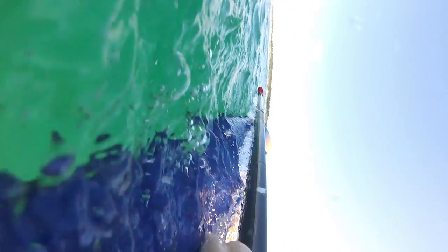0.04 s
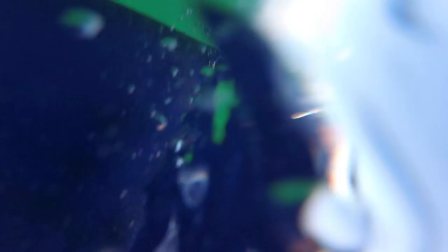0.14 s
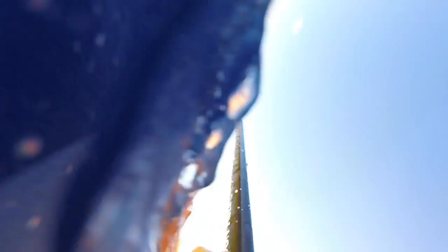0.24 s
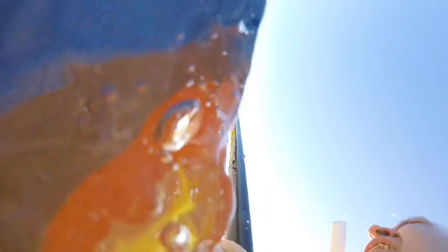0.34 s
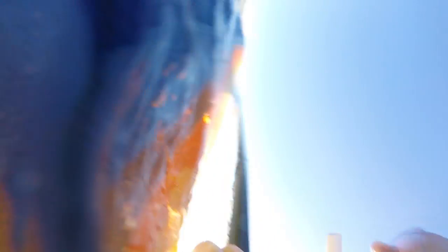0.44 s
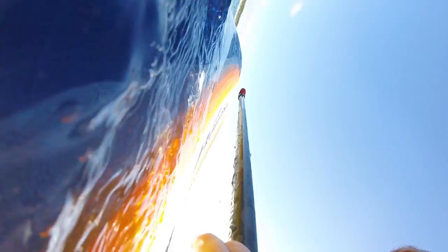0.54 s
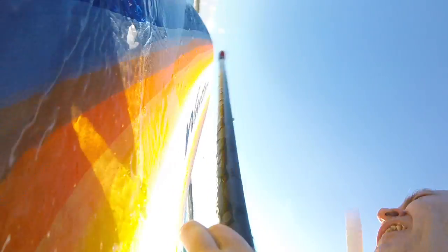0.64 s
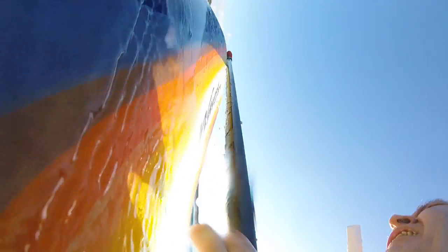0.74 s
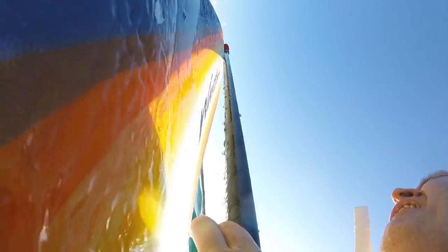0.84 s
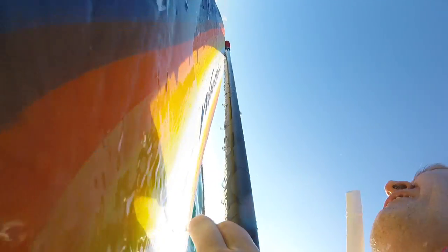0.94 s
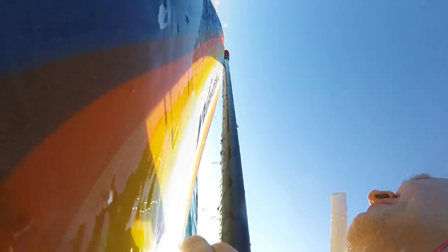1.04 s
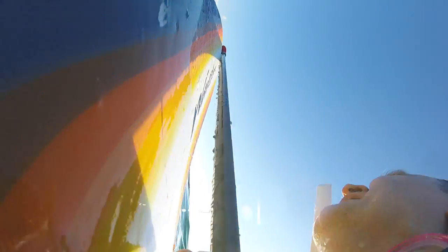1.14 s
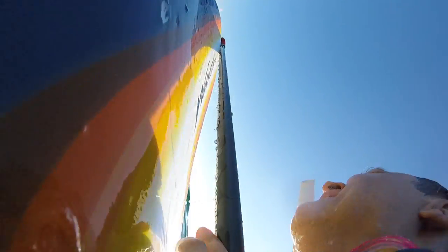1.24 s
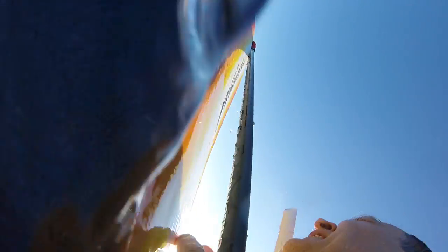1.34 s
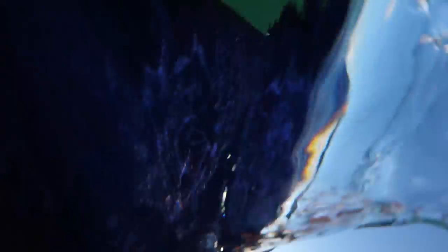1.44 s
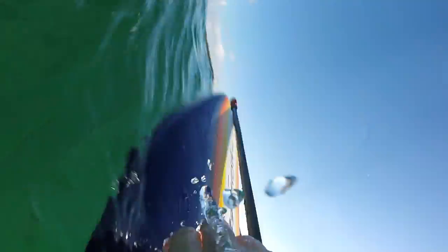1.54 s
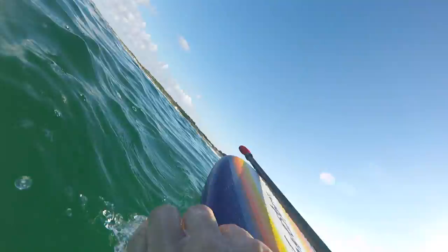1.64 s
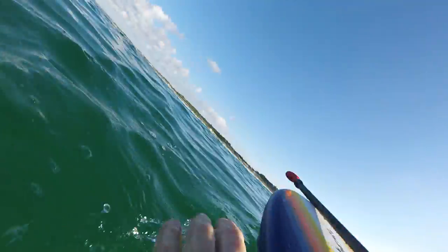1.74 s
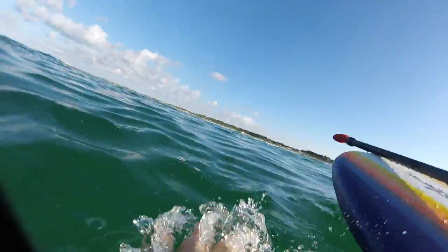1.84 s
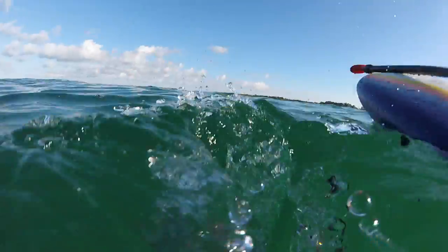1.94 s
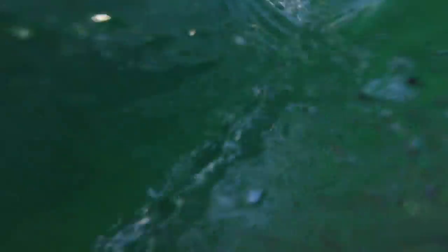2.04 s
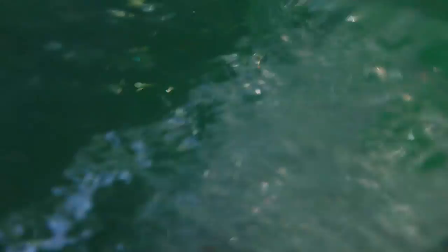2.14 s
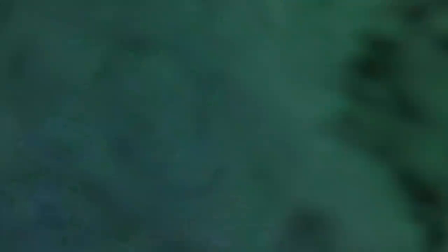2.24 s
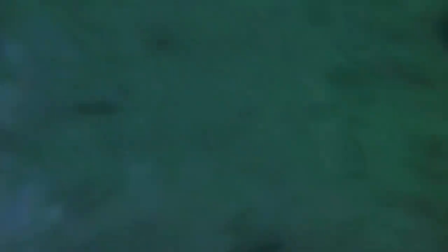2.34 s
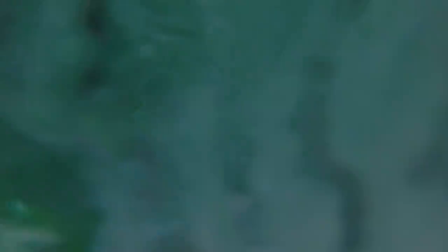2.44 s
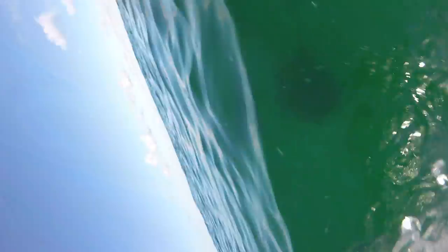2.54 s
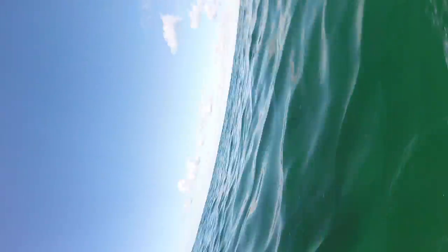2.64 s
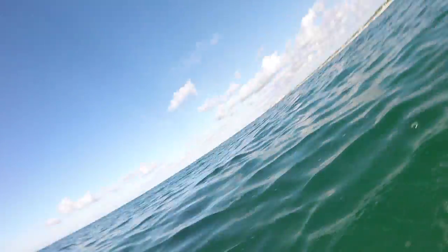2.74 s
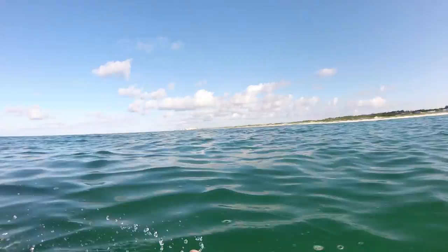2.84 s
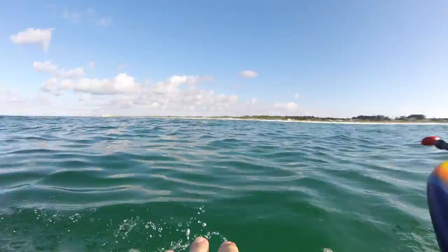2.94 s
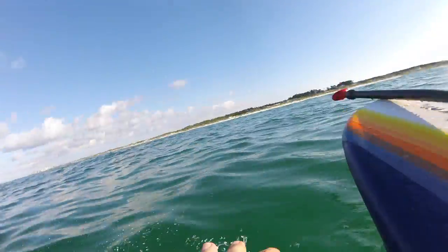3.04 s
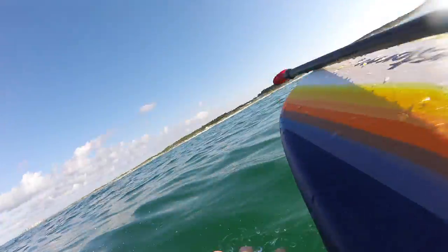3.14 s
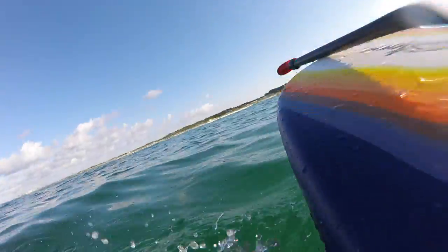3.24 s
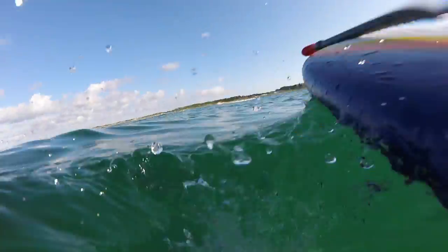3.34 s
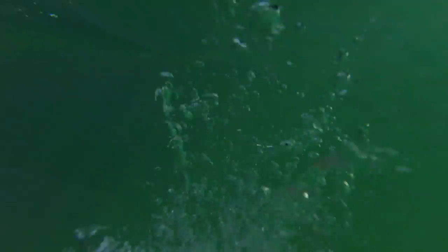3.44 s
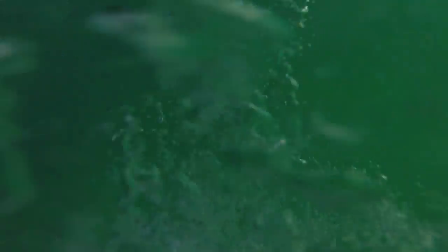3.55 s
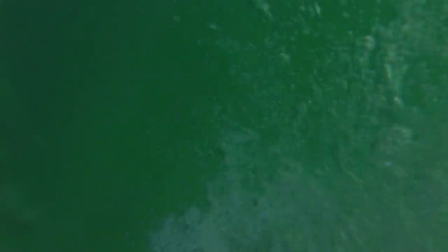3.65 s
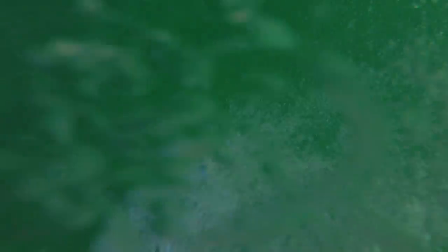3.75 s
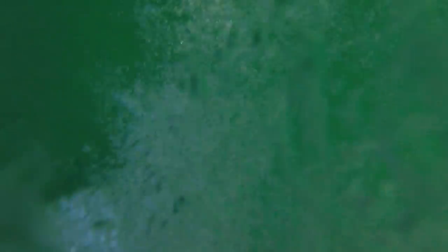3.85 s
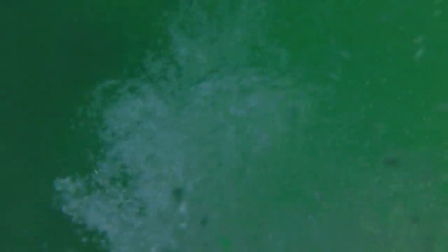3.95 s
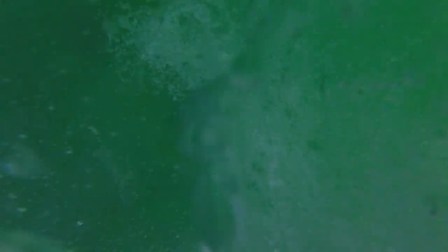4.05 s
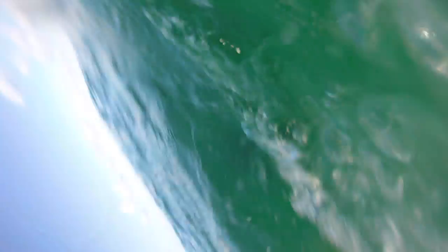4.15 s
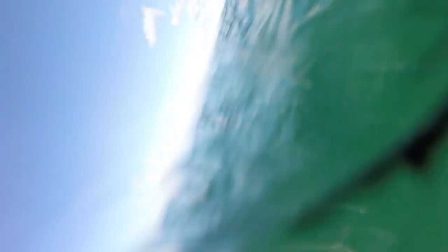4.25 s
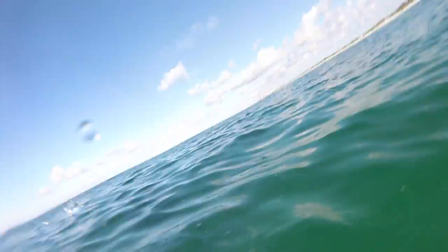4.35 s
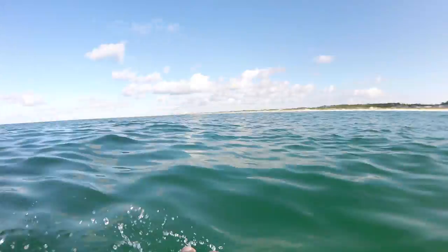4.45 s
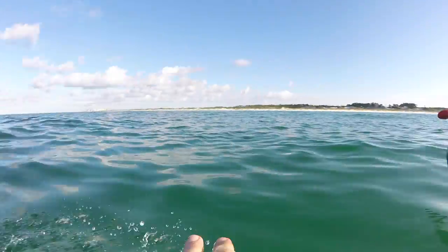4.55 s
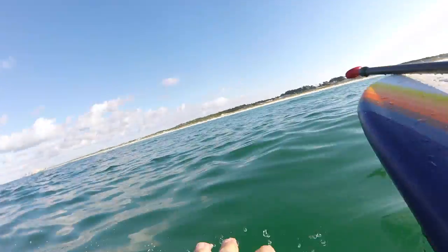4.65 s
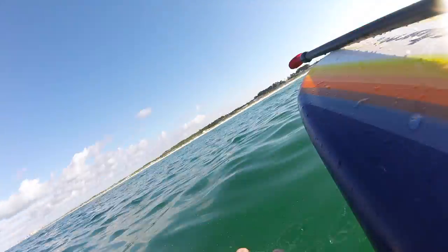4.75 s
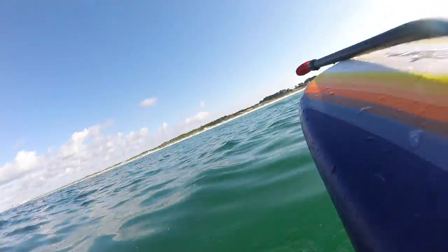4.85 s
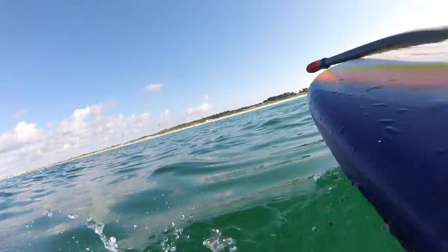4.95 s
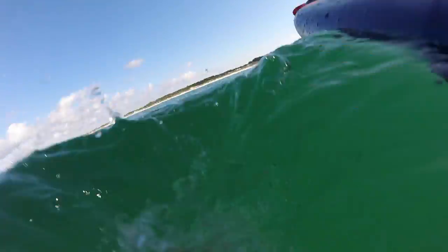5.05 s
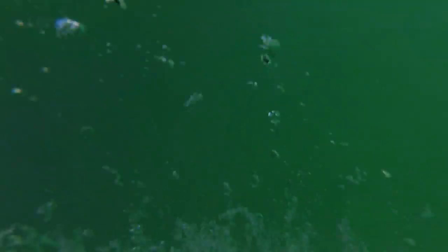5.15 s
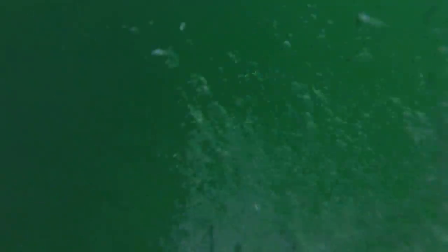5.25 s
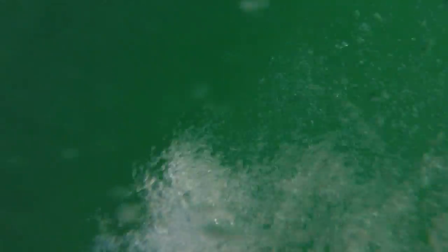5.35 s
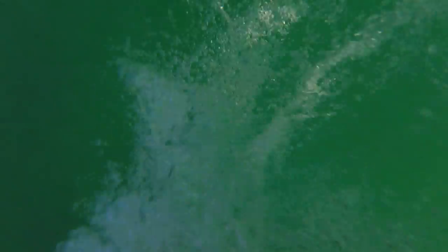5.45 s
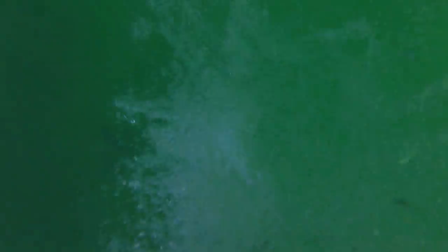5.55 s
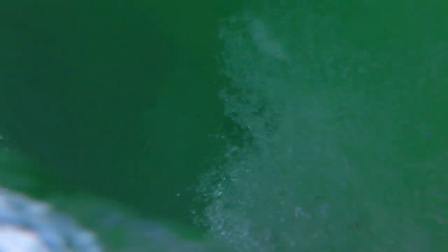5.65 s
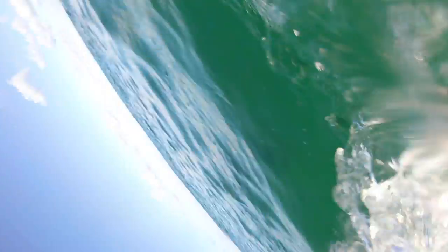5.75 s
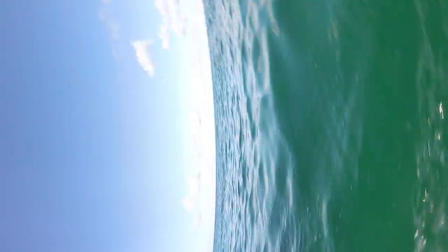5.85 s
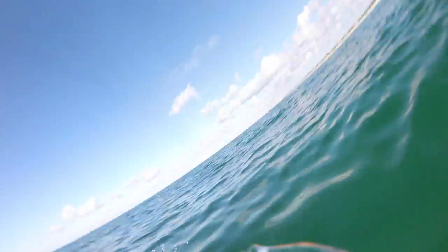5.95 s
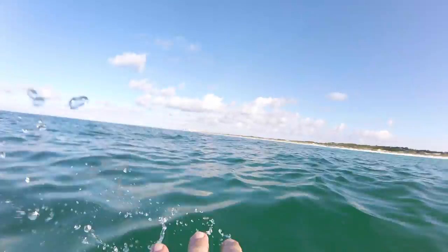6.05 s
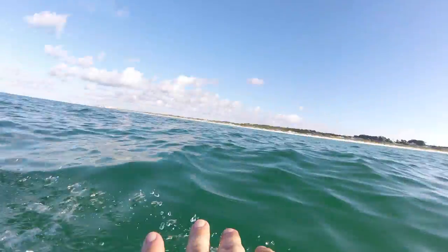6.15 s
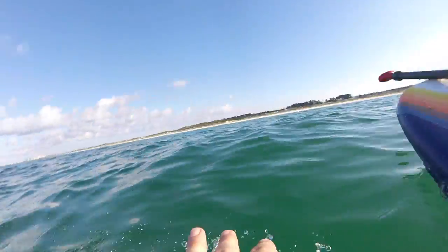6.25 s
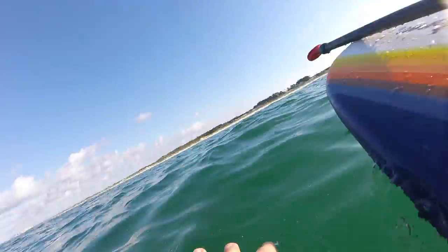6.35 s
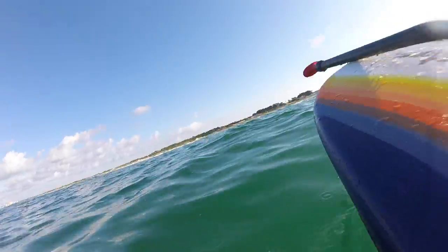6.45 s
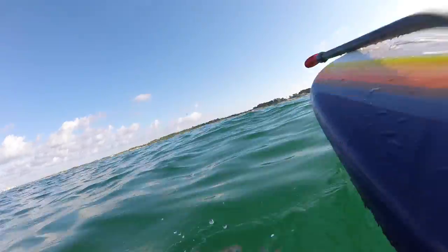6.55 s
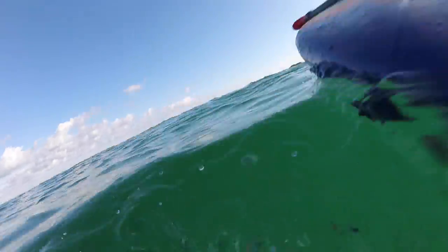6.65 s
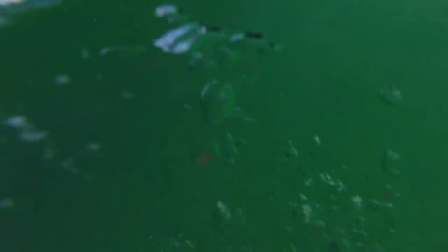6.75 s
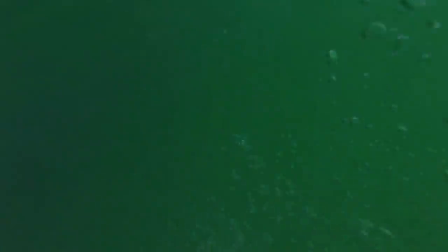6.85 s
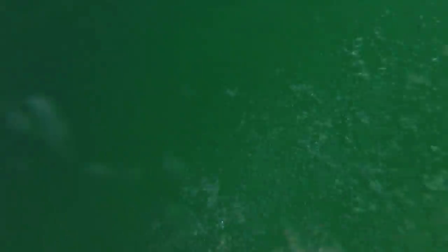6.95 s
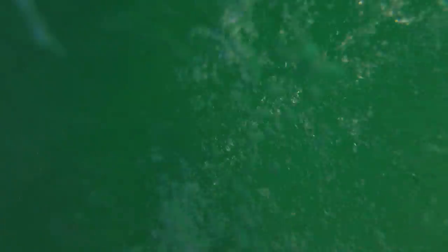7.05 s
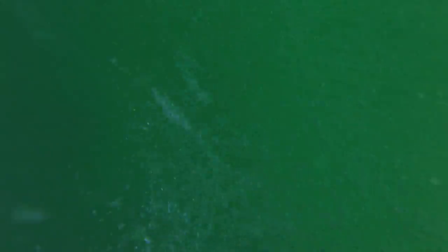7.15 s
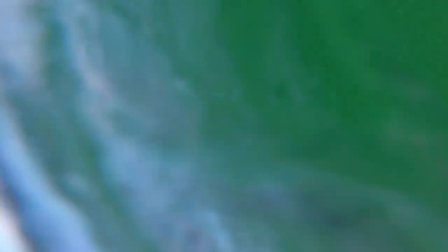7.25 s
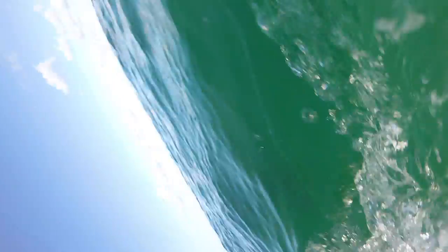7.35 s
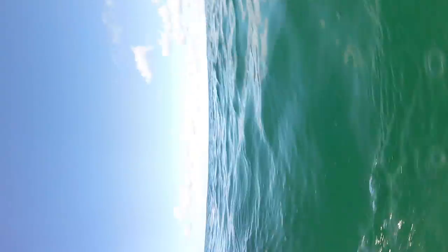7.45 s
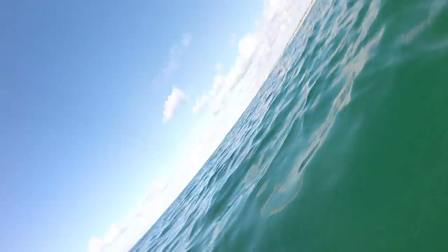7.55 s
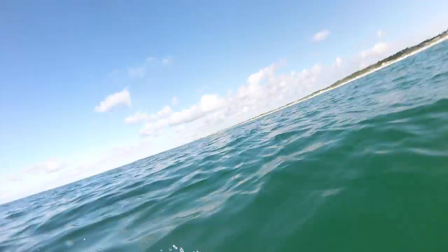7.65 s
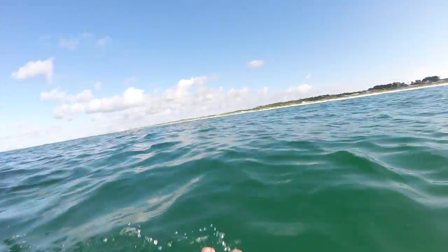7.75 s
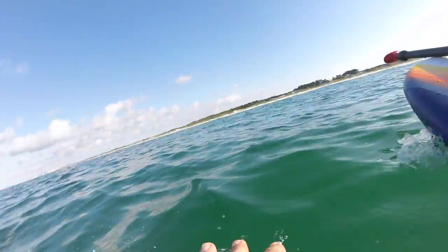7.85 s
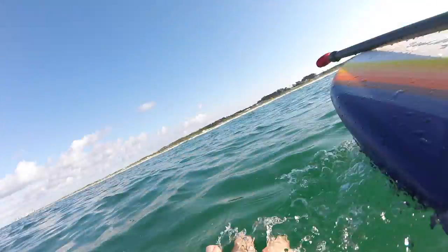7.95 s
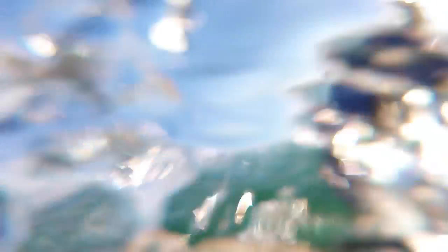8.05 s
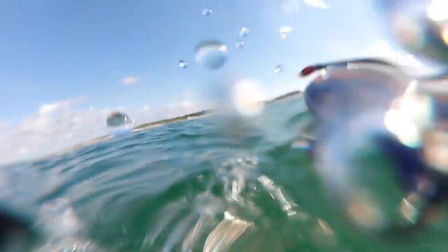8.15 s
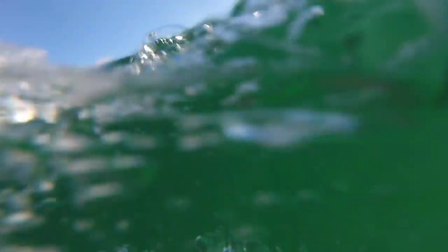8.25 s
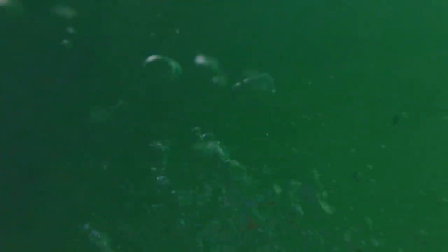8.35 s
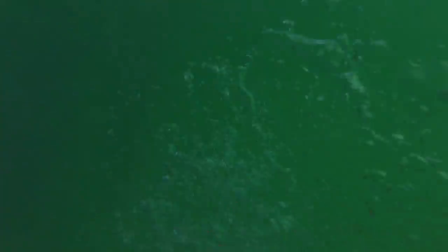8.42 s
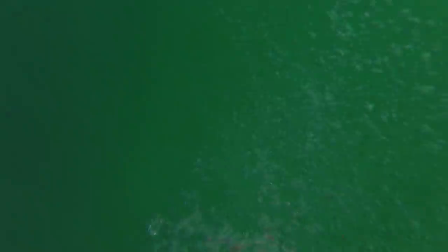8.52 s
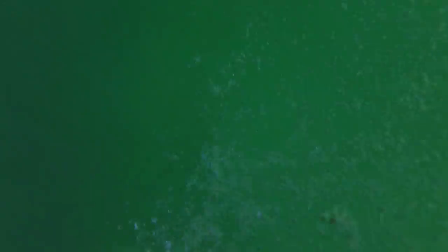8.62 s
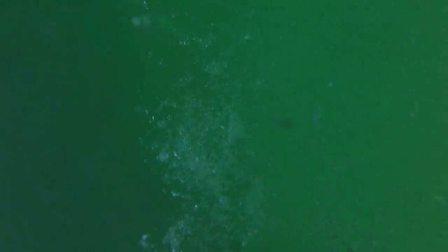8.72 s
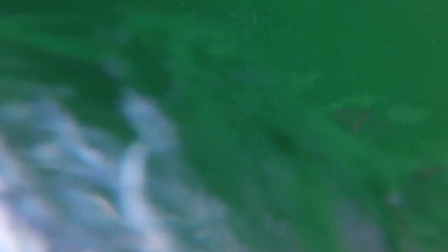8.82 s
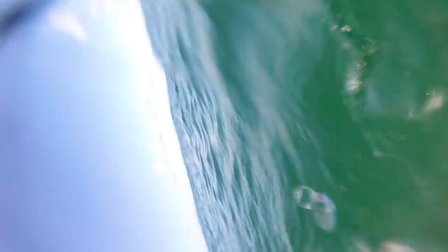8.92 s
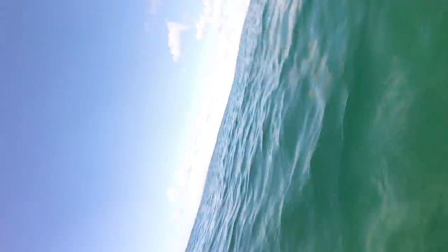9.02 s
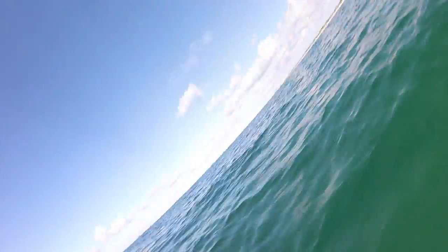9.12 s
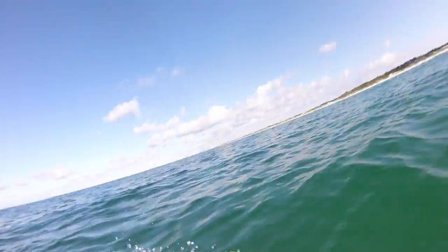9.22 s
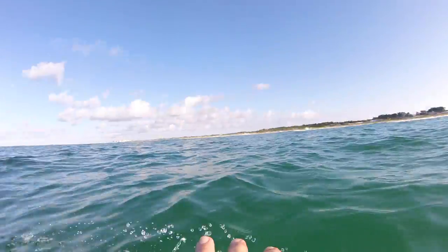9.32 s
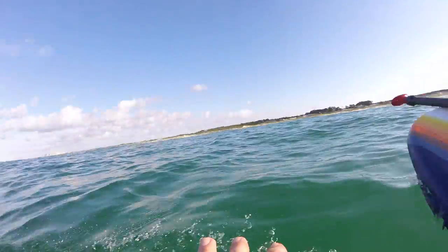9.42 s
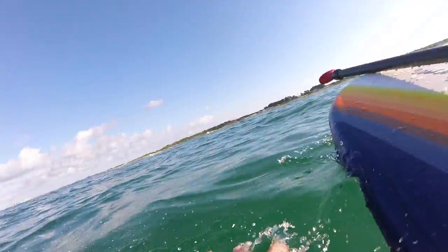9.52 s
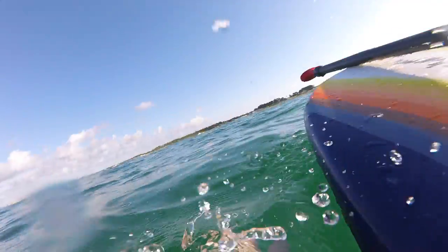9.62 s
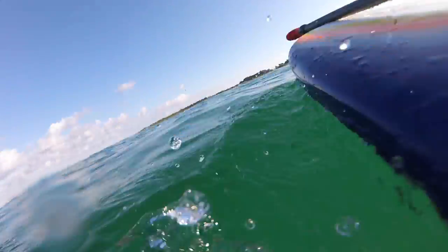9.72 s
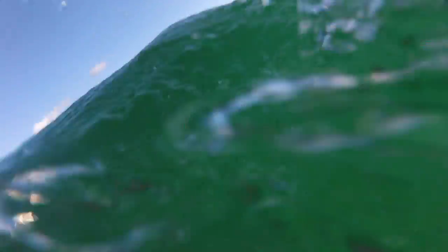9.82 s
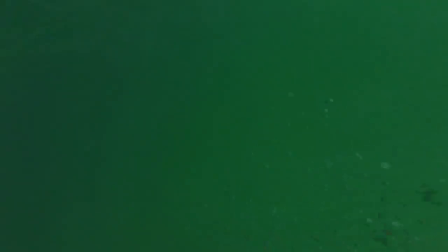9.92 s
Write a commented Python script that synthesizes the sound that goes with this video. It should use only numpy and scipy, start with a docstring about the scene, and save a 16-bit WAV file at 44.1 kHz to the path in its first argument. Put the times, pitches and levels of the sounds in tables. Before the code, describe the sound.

Close, muffled water sounds from a sealed microphone on a paddler's hand, beside a board in small waves. From 0 to 1.5 seconds, deep soft slaps land irregularly, at about 0.25, 0.5, 0.8, 1.1 and 1.4, with brief splashes, tiny crackles and slow low pressure rumble. Around 1.5 a wet plop and drips, then run-off swishes glide downward. At 2.1 the first plunge gurgles with thumps and hollow bubbles, fading by 2.7. A soft airy swing and light spray follow. Stronger plunges come at about 3.5, 5.15, 6.8 and 8.35, each opening with a bubbly burst, then half a second of low gurgling, fizz and rising bloops. Between them, near 4.5, 6.1, 7.7 and 9.3, low windy rushes swell over quiet wash, and splashing builds toward each entry. A sharper splash and slap lead into 8.35. The last plunge begins at 9.9 and is cut off.

```python
"""Hand-paddled board in small waves

Heard inside a sealed housing on the paddler's stroking arm: first, slaps as pressure pulses and dribbles
as ringing air pockets. Then six strokes plunge it into clouds of damped, rising bubble tones. Between
plunges band-limited noise makes wind and flow, and random clicks and bubbles make the spray.
The housing muffles: most layers fade steeply above about 3 kHz, leaving faint crackle, hiss and drops."""
import sys
import numpy as np
from scipy import signal
from scipy.fft import rfft, irfft, next_fast_len
from scipy.io import wavfile
from scipy.ndimage import uniform_filter1d

SR = 44100
rng = np.random.default_rng(int(sys.argv[2]) if len(sys.argv) > 2 else 0)


def materialize(psi):
    """Save the field psi as 16-bit PCM at rate SR to the path in sys.argv[1].

    A 1-D psi becomes a single channel; in a 2-D psi each row is a channel.
    """
    bounded = np.clip(np.atleast_2d(psi).T, -1, 1)
    quanta = np.round(bounded * 32767).astype(np.int16)
    wavfile.write(sys.argv[1], SR, quanta)


N = 440110
TIME = np.arange(N) / SR


def from_db(db):
    """Logarithmic level: decibels to amplitude gain."""
    return 10 ** (np.asarray(db) / 20)


def rms_one(x):
    """Normalisation: scale to rms 1."""
    return x / np.sqrt(np.mean(x ** 2) + 1e-20)


def add(out, s, sound):
    """Superposition: mix a short sound into out, starting at s seconds."""
    start = max(round(s * SR), 0)
    part = sound[:max(N - start, 0)]
    out[start:start + len(part)] += part


def low_pass(x, hz, order):
    """Butterworth low-pass: flat below hz, steeper above with rising order."""
    return signal.sosfilt(signal.butter(order, min(hz, 0.45 * SR), fs=SR, output="sos"), x)


def coloured(x, colour):
    """Spectral shaping: weight x by a curve of (frequency [Hz], level [dB per Hz]), then set rms 1."""
    hz, db = np.transpose(colour)
    size = next_fast_len(N)
    bins = np.maximum(np.arange(size // 2 + 1) * SR / size, 1)
    shape = np.interp(np.log(bins), np.log(hz), db)
    # beyond its ends the curve falls by 12 dB per octave
    slope = np.minimum(bins / hz[0], 1) * np.minimum(hz[-1] / bins, 1)
    return rms_one(irfft(rfft(x, size) * from_db(shape) * slope ** 2, size)[:N])


def steadied(x, span_s):
    """Short-term power normalisation: hold rms near 1 over span_s, keeping all faster grain."""
    size = max(int(span_s * SR), 2)
    power = uniform_filter1d(uniform_filter1d(x ** 2, size), size)
    return x / np.sqrt(np.maximum(power, 1e-9))


def drift(per_s):
    """Slow random modulation: normal values of spread 1, joined by straight lines, per_s knots a second."""
    knots = rng.standard_normal(int(per_s * N / SR) + 2)
    return np.interp(TIME * per_s, np.arange(len(knots)), knots)


def envelope(s, hold_s, db, attack_s, release_s, sag_db_per_s=0):
    """Exponential envelope: climbs 60 dB to reach db at s, holds while sagging, then falls 60 dB."""
    t = np.arange(-int(attack_s * SR), int((max(hold_s, 0) + release_s) * SR)) / SR
    away = np.maximum(-t, 0) / attack_s + np.maximum(t - hold_s, 0) / release_s
    gain = from_db(db - 60 * away - sag_db_per_s * np.maximum(t, 0))
    out = np.zeros(N)
    add(out, max(s + t[0], 0), gain[s + t >= 0])
    return out


def ring(clicks, hz, t60):
    """Damped resonator: a unit click sets a decaying sine of height about 1 ringing."""
    r, w = from_db(-60 / (t60 * SR)), 2 * np.pi * hz / SR
    return signal.lfilter([0, np.sin(w)], [1, -2 * r * np.cos(w), r * r], clicks + 1e-18)


def random_clicks(per_s, spread_db):
    """Shot noise: clicks at random moments, many small and a few large."""
    sizes = from_db(spread_db * np.minimum(rng.exponential(1, N), 4)) * rng.choice([-1, 1], N)
    return sizes * (rng.random(N) < per_s / SR)


def bubble(hz, t60, rise, swell_cycles=0.05):
    """Bubble resonance: a decaying sine whose pitch climbs by the share rise, as on nearing the surface."""
    t = np.arange(int(t60 * SR) + 2) / SR
    shape = from_db(-60 * t / t60) * (1 - np.exp(-hz * t / swell_cycles))
    return shape * np.sin(2 * np.pi * hz * t * (1 + rise * t / t60 / 2))


def bubble_cloud(per_s, low_hz, high_hz, cycles, spread_db, clump_db, count=20):
    """Sum of random bubble resonances; those of one size come in clumps; rms 1."""
    clicks, dealt = random_clicks(per_s, spread_db), rng.integers(0, count, N)
    out = np.zeros(N)
    for k, hz in enumerate(np.geomspace(low_hz, high_hz, count)):
        clumps = from_db(clump_db * drift(per_s=20))
        tone = bubble(hz, cycles / hz, rise=0.25)
        out += hz * signal.oaconvolve(clicks * (dealt == k) * clumps, tone)[:N]
    return rms_one(out)


def stray_bubbles(per_s, low_hz, high_hz, cycles, rise, spread_db, wall_hz=2900):
    """Isolated bubble resonances of random time, size and pitch, low-passed by the housing wall."""
    out = np.zeros(N)
    for when, pitch, size in rng.random((int(per_s * N / SR), 3)):
        hz = low_hz * (high_hz / low_hz) ** pitch
        add(out, when * N / SR, from_db(-spread_db * size) * bubble(hz, cycles / hz, rise))
    return low_pass(out, wall_hz, order=5)


def gliding_noise(hz, width_hz):
    """Frequency shifting: low-passed complex noise moved up to the changing pitch hz."""
    noise = low_pass([1, 1j] @ rng.standard_normal((2, N)), width_hz, order=3)[:len(hz)]
    return np.real(noise * np.exp(2j * np.pi * np.cumsum(hz) / SR))


def wandering(centre_hz, wander_octaves, width_hz, lumps_db=5):
    """Resonance of a changing cavity: narrow noise swells in lumps while its pitch wanders; rms 1."""
    hz = centre_hz * 2 ** (wander_octaves * drift(per_s=22))
    noise = gliding_noise(hz, width_hz)
    lumps = from_db(lumps_db * np.clip(drift(per_s=40), -2, 1))
    return rms_one(lumps * noise)


# water breaking at the surface beside the housing: (time [s], length [s], spray level [dB],
# sizzle level [dB], crackle on the housing before film's final gain [dB])
SPLASHES = [(-0.01, 0.1, -47.5, -87, -73.5), (0.239, 0.0053, -44, -51, -65.5),
            (0.269, 0.035, -39.5, -50, -88), (0.501, 0.0069, -51.5, -62, -82.5),
            (0.563, 0.032, -46, -80, -95), (0.764, 0.013, -41, -60, -97), (1.016, 0.013, -56.5, -65, -89),
            (1.123, 0.0081, -40.5, -76, -105), (1.176, 0.071, -53.5, -82, -103),
            (1.336, 0.089, -45.5, -63, -71), (1.459, 0.026, -47, -59, -71),
            (1.698, 0.13, -61.5, -65.5, -90), (1.88, 0.022, -50.5, -54, -86), (2.903, 0.078, -64, -64, -83),
            (3.251, 0.041, -51.5, -60, -74), (3.337, 0.056, -46.5, -65, -89),
            (4.084, 0.045, -48, -56.5, -87.5), (4.73, 0.016, -51.5, -78, -107),
            (4.988, 0.094, -47.5, -64, -95), (6.689, 0.093, -45, -55, -77.5),
            (7.964, 0.049, -48, -58.5, -90), (8.045, 0.017, -63, -52, -78), (8.265, 0.022, -37, -42, -68),
            (8.317, 0.027, -38.5, -48.5, -84), (8.822, 0.043, -39.5, -52.5, -85),
            (9.54, 0.064, -51, -72, -99), (9.7, 0.037, -51.5, -72, -104), (9.79, 0.046, -46, -55, -86)]
# spectra of falling water and of fine spray close by: (frequency [Hz], level [dB per Hz])
SPRAY_COLOUR = [(200, -12.5), (450, 12.5), (900, 12), (1400, 8), (2300, 5), (2800, -23), (3500, -36.5),
                (4500, -49.5), (8000, -45.5)]
SIZZLE_COLOUR = [(2200, -1), (2700, -0.5), (3300, -10), (3800, -16), (4400, -25), (6000, -28.5)]


def spray(sea_db=-69, wake_s=2.84, wake_db=-70.5, near_db=-54, bright_db=-17, swing_db=-9, chirp_db=8):
    """Superposed impacts: falling water merges into a wash, with tinkling bubbles and a bright sizzle."""
    ahead = reaching()
    shed = sum(envelope(s, hold_s, db + swing_db, attack_s=0.05, release_s=0.11)
               for s, hold_s, _, db, _ in SWINGS)
    # once under way the wake washes on behind
    wake = envelope(wake_s, N / SR, wake_db, attack_s=0.42, release_s=0.5)
    gain = (from_db(sea_db) + wake + ahead + shed) * from_db(2.4 * drift(per_s=25))
    fine_gain = from_db(bright_db) * gain
    for s, hold_s, db, sizzle_db, _ in SPLASHES:
        shape = envelope(s, hold_s, 0, attack_s=0.0085, release_s=0.079)
        gain = gain + from_db(db) * shape
        fine_gain = fine_gain + from_db(sizzle_db) * shape
    wash = rms_one(random_clicks(per_s=12000, spread_db=3.5))
    tinkle = bubble_cloud(per_s=900, low_hz=505, high_hz=3720, cycles=22, spread_db=8.5, clump_db=5.0)
    # far water blurs into a wash; the nearer the splash, the more single bubbles stand out
    drizzle = wash + np.minimum(gain / from_db(near_db), 1) * tinkle
    splash = steadied(coloured(drizzle, SPRAY_COLOUR), span_s=0.042)
    sizzle = steadied(coloured(drizzle, SIZZLE_COLOUR), span_s=0.042)
    chirps = stray_bubbles(per_s=26, low_hz=1000, high_hz=2400, cycles=46, rise=0.18, spread_db=12.5)
    return gain * splash + fine_gain * sizzle + from_db(chirp_db) * ahead * chirps


# a narrow hiss coming and going in the housing: (time [s], length [s], level [dB])
HISSES = [(0, 2.3, -93), (2.926, 0.084, -76), (3.148, 0.27, -84.5)]
# spectrum of tiny bubbles bursting on the housing: (frequency [Hz], level [dB per Hz])
FILM_COLOUR = [(2500, 1), (6520, -1), (6850, 1), (8800, -5), (10500, -20.5), (14000, -22)]


def film(lull_db=-96, under_db=-82, reach_db=-38, hiss_hz=6500):
    """Shot noise of tiny bubbles bursting on the housing, beside a faint resonant hiss."""
    gain = from_db(lull_db) + from_db(reach_db) * reaching()
    gain += sum(envelope(s, under_s, under_db, attack_s=0.2, release_s=0.5, sag_db_per_s=sag / 2)
                for s, under_s, *_, sag in PLUNGES)
    gain *= from_db(3.0 * drift(per_s=30))
    gain += sum(envelope(s, hold_s, db, attack_s=0.033, release_s=0.3) for s, hold_s, *_, db in SPLASHES)
    crackle = rms_one(random_clicks(per_s=230, spread_db=13.0)) + from_db(-14.0) * rng.standard_normal(N)
    crackle = steadied(coloured(crackle, FILM_COLOUR), span_s=0.056)
    hiss = rms_one(np.diff(ring(rng.standard_normal(N), hiss_hz, t60=0.008), prepend=0))
    hiss_gain = sum(envelope(*row, attack_s=0.083, release_s=0.35) for row in HISSES)
    hiss_gain = hiss_gain * from_db(4.5 * drift(per_s=12.0))
    return from_db(6.0) * gain * crackle + hiss_gain * hiss  # all crackle levels rise by 6 dB


# spectra of rushing eddies and of slow pressure surges: (frequency [Hz], level [dB per Hz])
RUSH_COLOUR = [(50, -1.5), (100, -4), (160, 2.5), (240, -7.5), (380, -15.5), (700, -30), (1200, -30.5),
               (2500, -68.5)]
SURGE_COLOUR = [(14, -0.5), (28, -1), (50, -3.5), (80, -6), (120, -13.5), (220, -54), (500, -76)]


def flow(rush_db=-63, surge_db=-48, rush_splash_db=-6, rush_slap_db=-34, surge_under_db=-32, surge_slap_db=-21):
    """Turbulent pressure: lumpy eddies and slow surges, under water, in swings and after slaps; splashes rush."""
    rush, surge = from_db(rush_db), from_db(surge_db)
    for s, hold_s, db, *_ in SPLASHES:
        rush = rush + envelope(s, hold_s, db + rush_splash_db, attack_s=0.018, release_s=0.18)
    for s, under_s, _, _, db, _, _, sag in PLUNGES:
        rush += envelope(s, under_s, db, attack_s=0.04, release_s=0.27, sag_db_per_s=sag / 2)
        surge = surge + envelope(s, under_s, surge_under_db, attack_s=0.14, release_s=0.4, sag_db_per_s=sag / 2)
    for s, hold_s, swing_rush_db, _, swing_surge_db in SWINGS:
        rush += envelope(s, hold_s, swing_rush_db, attack_s=0.05, release_s=0.8)
        surge += envelope(s, 0.57, swing_surge_db, attack_s=0.1, release_s=1.0)
    for s, db, _ in SLAPS:
        rush += envelope(s, 0, db + rush_slap_db, attack_s=0.054, release_s=0.14)
        surge += envelope(s, 0, db + surge_slap_db, attack_s=0.26, release_s=0.28)
    lumps = from_db(4.0 * drift(per_s=30))
    eddies = lumps * steadied(coloured(rng.standard_normal(N), RUSH_COLOUR), span_s=0.04)
    swell = steadied(coloured(rng.standard_normal(N), SURGE_COLOUR), span_s=0.06)
    swell = from_db(2.5 * drift(per_s=14)) * swell
    return from_db(10.0) * rush * eddies + surge * swell  # all rush levels rise by 10 dB


def rocking(end_s=1.41, surge_db=-31, sway_hz=30):
    """Low-frequency pressure: between the first slaps the swaying board presses slowly on the housing."""
    sway = low_pass(coloured(rng.standard_normal(N), SURGE_COLOUR), sway_hz, order=4)
    return envelope(0, end_s, surge_db, attack_s=0.08, release_s=0.66) * steadied(sway, span_s=0.1)


# the largest air pockets closing nearby:
# (time [s], level before the final gain [dB], pitch [Hz], 60 dB decay time [s])
PLOPS = [(0.0272, -21, 1970, 0.01), (0.0299, -8.5, 1810, 0.004), (0.046, -44, 2680, 0.019),
         (0.1557, -26.5, 2460, 0.0041), (0.2122, -16, 575, 0.0069), (0.972, -30.5, 1060, 0.0021),
         (1.1299, -22.5, 655, 0.0073), (1.2306, -18.5, 517, 0.0037), (1.3845, -14, 550, 0.0052),
         (1.3499, -21, 2190, 0.024), (1.363, -22.5, 2980, 0.0081), (1.368, -25, 2300, 0.01),
         (1.47, -24.5, 2720, 0.021), (1.479, -28.5, 2400, 0.014), (1.5285, -10, 1845, 0.014),
         (1.5289, -14.5, 700, 0.01), (1.8248, -1, 296, 0.0046), (1.9859, -8.5, 744, 0.0076),
         (2.1238, -10, 557, 0.0098), (2.2403, -19.5, 414, 0.047), (2.339, -8.5, 507, 0.011),
         (2.4142, -9, 680, 0.0069), (2.4187, -19.5, 2020, 0.017), (2.4503, -18.5, 1590, 0.015),
         (2.66, -37, 1260, 0.0081), (3.0087, -16, 540, 0.0022), (3.259, -25, 1500, 0.0042),
         (3.276, -27, 1300, 0.007), (3.296, -31, 2500, 0.0065), (3.37, -21, 960, 0.013),
         (3.4705, -17, 2070, 0.017), (3.6331, -2, 375, 0.0043), (3.7242, -9, 630, 0.0068),
         (3.7431, -9, 630, 0.029), (4.0441, -13.5, 730, 0.016), (4.189, -28.5, 302, 0.024),
         (4.289, -31.5, 1690, 0.0033), (4.942, -22.5, 1400, 0.0058), (5.0683, -19, 585, 0.0037),
         (5.145, -10.5, 900, 0.005), (5.1637, -10.5, 690, 0.027), (5.2015, -17.5, 2280, 0.01),
         (5.2313, -10.5, 650, 0.027), (5.448, -13.5, 560, 0.027), (5.5507, -13.5, 735, 0.04),
         (5.613, -19, 1950, 0.006), (5.6585, -4, 450, 0.004), (6.2049, -28.5, 1950, 0.0087),
         (6.5311, -10, 457, 0.0014), (6.8092, -9.5, 1000, 0.0053), (6.907, -23, 630, 0.013),
         (6.9448, -5, 840, 0.0045), (7.0182, -12.5, 810, 0.009), (7.059, -14, 480, 0.0093),
         (7.194, -15, 634, 0.019), (7.2432, -13, 670, 0.0041), (7.2426, -17.5, 1700, 0.0063),
         (7.271, -20, 560, 0.0057), (7.354, -27.5, 310, 0.025), (7.4613, -27.5, 2030, 0.0069),
         (8.119, -31, 520, 0.0034), (8.283, -18.5, 1720, 0.0063), (8.2995, -13.5, 626, 0.0037),
         (8.3767, -5.5, 450, 0.013), (8.397, -13, 900, 0.0047), (8.7013, -20, 714, 0.02),
         (8.697, -25, 2000, 0.032), (9.533, -32, 1520, 0.012), (9.6969, -23, 1550, 0.0046),
         (9.6996, -22.5, 380, 0.013), (9.775, -26, 845, 0.013), (9.797, -5.5, 766, 0.0021),
         (9.806, -19, 1000, 0.005), (9.9019, -6, 800, 0.005)]


def plops(wall_db=-17, wall_hz=2050, wall_t60=0.015):
    """Coupled resonance: each closing air pocket rings briefly and the housing wall rings along."""
    out = np.zeros(N)
    for s, db, hz, t60 in PLOPS:
        add(out, s, from_db(db) * bubble(hz, t60, rise=0.18))
        wall_gain = from_db(db + wall_db) * np.minimum(t60 / wall_t60, 1)
        add(out, s, wall_gain * bubble(wall_hz, wall_t60, rise=0))
    return from_db(3.0) * low_pass(out, hz=2730, order=5)


# air cavities pinching off: (time [s], length [s], peak level [dB], start pitch [Hz], end pitch [Hz])
GULPS = [(0.032, 0.0094, -33, 1600, 2100), (1.515, 0.044, -35, 664, 1060), (1.941, 0.0088, -31, 1020, 1130),
         (3.328, 0.016, -34, 1230, 1280), (3.483, 0.024, -10.5, 359, 1140), (3.589, 0.01, -26, 1840, 2200),
         (3.827, 0.011, -24, 1920, 2200), (3.86, 0.03, -17.5, 597, 785), (3.954, 0.013, -29.5, 1520, 1750),
         (3.998, 0.015, -20.5, 683, 814), (4.949, 0.028, -34, 516, 600), (5.182, 0.0085, -25, 2030, 2300),
         (5.343, 0.031, -20.5, 727, 850), (5.52, 0.014, -22, 750, 1085), (5.583, 0.011, -28.5, 1700, 2000),
         (6.723, 0.016, -25.5, 1300, 1600), (7.123, 0.014, -34, 1680, 1890), (8.514, 0.032, -23, 594, 667),
         (8.519, 0.017, -29.5, 1580, 2200), (8.561, 0.011, -20.5, 696, 845),
         (8.792, 0.052, -30.5, 450, 520), (8.864, 0.014, -32.5, 1200, 2300)]


def gulps():
    """Shrinking cavity resonance: a note swells and pinches off as its pitch climbs."""
    out = np.zeros(N)
    for s, length_s, db, start_hz, end_hz in GULPS:
        hz = np.geomspace(start_hz, end_hz, max(int(length_s * SR), 2))
        u = np.linspace(0, 1, len(hz))
        swell = np.sin(np.pi * np.sqrt(u)) ** 2
        add(out, s, from_db(db) * swell * np.sin(2 * np.pi * np.cumsum(hz) / SR))
    return out


# water slapping the housing: (time [s], peak level [dB], pitch [Hz])
SLAPS = [(0.047, -13, 45), (0.215, -22, 129), (0.244, -9.5, 81.4), (0.278, -9.5, 56), (0.366, -18.5, 50.7),
         (0.51, -8, 68), (0.774, -7, 100), (1.126, -9, 76.4), (1.378, -8, 58), (1.532, -22, 148),
         (1.829, -15, 85), (1.915, -20, 44.3), (2.01, -14.5, 70), (2.175, -9.5, 58), (2.243, -19, 93),
         (2.337, -13.5, 92), (3.284, -12, 56), (3.303, -18.5, 85), (3.359, -18.5, 44.7), (3.478, -14, 81),
         (3.58, -9.5, 79), (3.637, -15.5, 70.4), (3.728, -12.5, 77), (4.704, -29, 170),
         (4.948, -14.5, 56.6), (5.338, -14.5, 67.6), (5.451, -16, 130), (5.563, -14, 89),
         (5.668, -18, 47.4), (5.771, -26.5, 121), (6.421, -19, 52), (6.8, -22.5, 170), (7.046, -14.5, 75.5),
         (7.056, -18, 95), (7.2, -13.5, 39.3), (7.358, -24.5, 140), (7.947, -15, 128), (8.081, -10, 52),
         (8.246, -8, 95), (8.325, -16.5, 81), (8.707, -16.5, 44), (8.846, -12.5, 57.6), (8.961, -19.5, 92)]


def thumps(froth_db=-28, froth_hz=700, froth_t60=0.066, wall_hz=2800):
    """Pressure pulse: a slap pushes, sucks and pushes again; a puff of froth follows the suction."""
    pressure, puffs = np.zeros(N), np.zeros(N)
    t = np.arange(-SR // 20, SR // 20) / SR
    for s, db, hz in SLAPS:
        u = (np.pi * hz * t) ** 2
        add(pressure, s + t[0], from_db(db) * (2 * u - 1) * np.exp(-u))
        add(puffs, s, from_db(db - 60 * (t - t[0]) / froth_t60))
    froth = low_pass(low_pass(rng.standard_normal(N), froth_hz, order=2), wall_hz, order=4)
    return pressure + from_db(froth_db) * puffs * rms_one(froth)


# drops hitting the housing: (time [s], level before mode levels and the final gain [dB])
DROPS = [(0.1558, -59), (0.847, -68), (0.943, -68), (1.0706, -60.5), (1.459, -50), (1.4857, -56),
         (1.529, -35.5), (1.5504, -56), (2.0186, -60), (2.0332, -45), (2.062, -56.5), (2.126, -46.5),
         (2.541, -65), (3.009, -62), (3.3736, -61.5), (3.4062, -59), (3.438, -63), (5.0702, -52.5),
         (5.7744, -61), (6.8944, -54.5), (8.0144, -60.5), (8.269, -54.5), (8.376, -57), (9.806, -56),
         (9.872, -60)]
# modes of the housing under a drop: (frequency [Hz], relative level [dB], 60 dB decay time [s])
HOUSING = [(2240, 20, 0.0011), (5440, 3.5, 0.0022), (6450, 1.5, 0.0078), (8200, 6, 0.0012)]


def drops():
    """Modal excitation: each drop strikes every mode of the housing with a strength of its own."""
    out = np.zeros(N)
    chance_db = 2 * rng.standard_normal((len(DROPS), len(HOUSING)))
    for (s, db), luck in zip(DROPS, chance_db):
        for k, (hz, mode_db, t60) in enumerate(HOUSING):
            add(out, s, (-1) ** k * from_db(db + mode_db + luck[k]) * bubble(hz, t60, rise=0))
    return from_db(9.0) * low_pass(out, hz=11300, order=3)


# water running off the housing:
# (start [s], end [s], level before the swell [dB], start pitch [Hz], end pitch [Hz])
SWISHES = [(0.324, 0.38, -41, 447, 560), (1.339, 1.46, -45, 2430, 2135), (1.437, 1.487, -58, 2890, 2490),
           (1.684, 1.868, -66, 2170, 2600), (1.836, 1.91, -53.5, 2600, 2840), (1.871, 2.01, -48, 1300, 896),
           (1.929, 2.157, -37.5, 970, 640), (2.052, 2.294, -32.5, 684, 518),
           (2.474, 2.593, -42.5, 565, 581), (6.643, 6.702, -41, 603, 786), (6.744, 6.765, -37, 1900, 2300),
           (8.329, 8.454, -27.5, 682.4, 859)]


def swishes(width_share=0.19):
    """Gliding cavity resonance: rushing water sounds through an air gap of changing size and pitch."""
    out = np.zeros(N)
    for start, end, db, start_hz, end_hz in SWISHES:
        hz = np.geomspace(start_hz, end_hz, max(int((end - start) * SR), 2))
        swish = rms_one(gliding_noise(hz, width_share * start_hz))
        add(out, start, from_db(db) * np.hanning(len(hz)) * swish)
    return out


# the hand plunging in: (time [s], time under water [s], gurgle level [dB], fizz level before its cut [dB],
# rush level before flow's final gain [dB], gurgle lag [s], fizz lag [s], sag [dB/s])
PLUNGES = [(2.109, 0.33, -32, -46.5, -44, 0.2, 0.16, -17), (3.471, 0.54, -29, -32.5, -46, 0.11, 0.15, -2),
           (5.152, 0.47, -30.5, -37, -41, 0.075, 0.063, -0.5),
           (6.807, 0.42, -27, -34.5, -42, 0.068, 0.033, 43.5),
           (8.368, 0.473, -32.5, -41, -50, 0.011, 0.04, 26),
           (9.875, 0.2, -36, -36, -35.5, 0.05, 0.053, -25)]
# a mass of air breaking up, on entry or under water:
# (time [s], length [s], roar level [dB], fizz level before its cut [dB])
BURSTS = [(2.116, 0.0056, -22.5, -62), (2.239, 0.035, -29, -57), (2.328, 0.0084, -24.5, -40),
          (2.398, 0.007, -26, -27.5), (3.465, 0.03, -23.5, -34.5), (4.048, 0.018, -36.5, -33),
          (5.148, 0.033, -20.5, -31.5), (5.316, 0.023, -20, -26), (5.356, 0.013, -29.5, -29.5),
          (5.515, 0.012, -26.5, -30), (5.598, 0.018, -33, -34.5), (6.801, 0.014, -18, -21.5),
          (6.958, 0.015, -31, -35), (8.372, 0.012, -16, -31), (8.394, 0.0065, -39, -25.5),
          (8.514, 0.057, -38, -42), (9.873, 0.0093, -17.5, -27), (9.929, 0.0072, -23.5, -46)]
# spectra of large bubbles, small bubbles and bursts: (frequency [Hz], level [dB per Hz])
GURGLE_COLOUR = [(150, -5), (270, -5), (520, 1), (720, 3), (900, -4.5), (1150, -18.5), (1600, -27.5),
                 (3000, -72)]
FIZZ_COLOUR = [(700, -20.5), (1200, -8), (1600, -7), (2080, -1), (2400, -9.5), (2750, -23), (3300, -25),
               (4100, -46), (6000, -42)]
BURST_COLOUR = [(130, 7), (450, 2.5), (800, 4.5), (1100, -8.5), (1500, -16), (2300, -32), (3200, -49.5),
                (5000, -47)]


def churn(blip_db=4.0, tick_db=4.5, large_cavity_db=-7, cavity_db=-6, small_cavity_db=-8):
    """Bubble size sets pitch: dragged-under air breaks up, large bubbles gurgle, small fizz, cavities sing."""
    gurgle_gain = fizz_gain = burst_gain = 0
    for s, under_s, gurgle_db, fizz_db, _, gurgle_lag, fizz_lag, sag in PLUNGES:
        gurgle_gain += envelope(s + gurgle_lag, under_s - gurgle_lag, gurgle_db, attack_s=0.18,
                                release_s=0.3, sag_db_per_s=sag)
        fizz_gain += envelope(s + fizz_lag, under_s - fizz_lag, fizz_db, attack_s=0.034 + 1.57 * fizz_lag,
                              release_s=0.28, sag_db_per_s=sag / 2)
    for s, hold_s, roar_db, fizz_db in BURSTS:
        burst_gain += envelope(s, hold_s, roar_db, attack_s=0.02, release_s=0.077)
        fizz_gain += envelope(s, hold_s, fizz_db, attack_s=0.0063, release_s=0.066)
    large = bubble_cloud(per_s=900, low_hz=210, high_hz=1257, cycles=20, spread_db=3.5, clump_db=4.0)
    small = bubble_cloud(per_s=1500, low_hz=1100, high_hz=3900, cycles=36, spread_db=4.5, clump_db=4.5)
    blips = stray_bubbles(per_s=6.7, low_hz=480, high_hz=864, cycles=51, rise=0.3, spread_db=3.0)
    ticks = stray_bubbles(per_s=35, low_hz=1500, high_hz=2300, cycles=24, rise=0.2, spread_db=8)
    gurgle = steadied(coloured(large, GURGLE_COLOUR), span_s=0.06)
    gurgle += from_db(cavity_db) * wandering(centre_hz=657.5, wander_octaves=0.22, width_hz=78)
    gurgle += from_db(large_cavity_db) * wandering(centre_hz=288.5, wander_octaves=0.3, width_hz=67)
    gurgle += from_db(blip_db) * blips
    fizz = steadied(coloured(small, FIZZ_COLOUR), span_s=0.06)
    fizz += from_db(small_cavity_db) * wandering(centre_hz=2054, wander_octaves=0.16, width_hz=170)
    fizz += from_db(tick_db) * ticks
    roar = steadied(coloured(random_clicks(per_s=3600, spread_db=7.0), BURST_COLOUR), span_s=0.0084)
    clusters = from_db(2.6 * drift(per_s=36))
    return clusters * (gurgle_gain * gurgle + from_db(-5.5) * fizz_gain * fizz) + burst_gain * roar


def reaching(db=-54.5, rise_s=1.1, lead_s=0.18):
    """Level rising with nearness: splashing ahead grows until just before each stroke after the first."""
    return sum(envelope(s - lead_s, 0, db, rise_s, release_s=1.0) for s, *_ in PLUNGES[1:])


# the arm swinging forward through the air: (time [s], time at top speed [s], rush level before flow's
# final gain [dB], wind level before its final gain [dB], pressure surge level [dB])
SWINGS = [(2.808, 0.24, -48.5, -68, -43.5), (4.465, 0.088, -44, -59, -40), (6.064, 0.17, -43.5, -58.5, -38),
          (7.666, 0.19, -44, -59.5, -36), (9.263, 0.16, -40, -52, -51)]


def swings(low_hz=230, high_hz=900):
    """Wind noise: band-limited turbulence swells and fades with the arm's swing."""
    gain = sum(envelope(s + hold_s / 2, 0, db, attack_s=0.27, release_s=0.42)
               for s, hold_s, _, db, _ in SWINGS)
    band = signal.butter(3, [low_hz, high_hz], "band", fs=SR, output="sos")
    wind = low_pass(signal.sosfilt(band, rng.standard_normal(N)), low_hz, order=1)
    return from_db(17.5) * gain * rms_one(wind)


def scene():
    """Superposition of all the water and air around the housing, in one channel."""
    water = spray() + film() + swishes() + churn()
    hits = plops() + gulps() + thumps() + drops()
    return (water + hits + flow() + rocking() + swings())[None]


def record(dry, top=0.5, stop_hz=15400):
    """Saturation and band limit: peaks are rounded below top, and all above stop_hz is cut by 70 dB."""
    rounded = dry / (1 + (dry / top) ** 6) ** (1 / 6)
    return signal.sosfilt(signal.cheby2(12, 70, stop_hz, fs=SR, output="sos"), rounded)


dry = scene()
out = record(dry)
materialize(out)
```